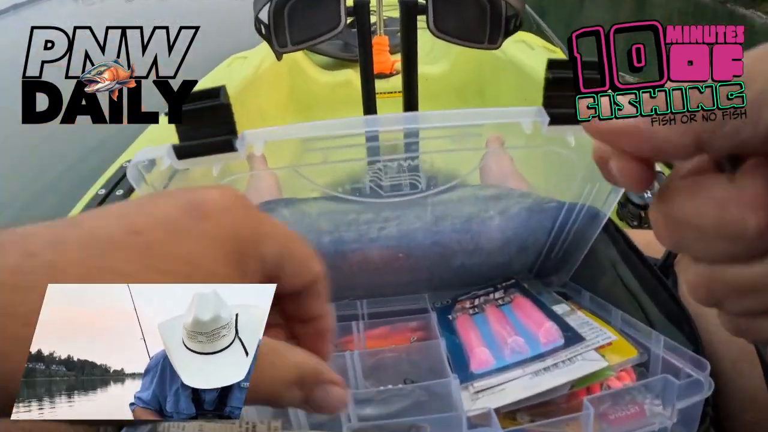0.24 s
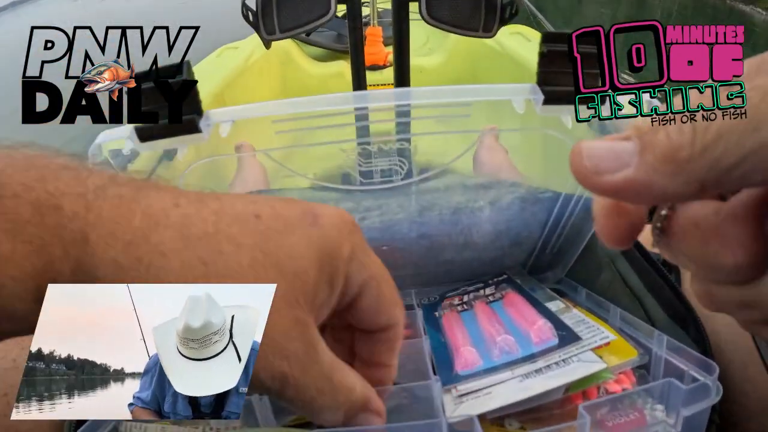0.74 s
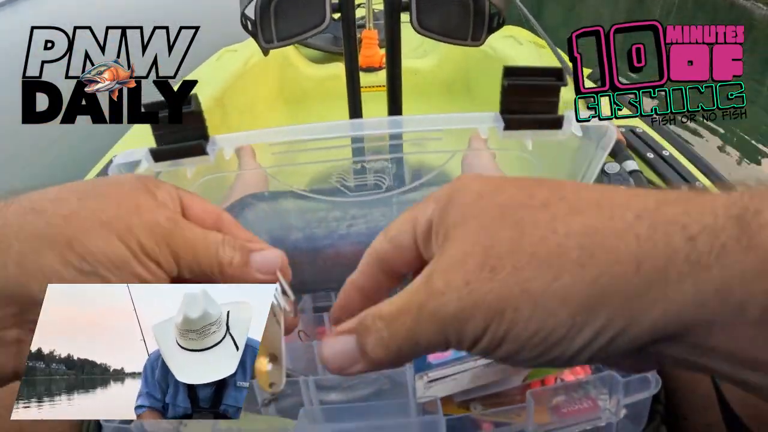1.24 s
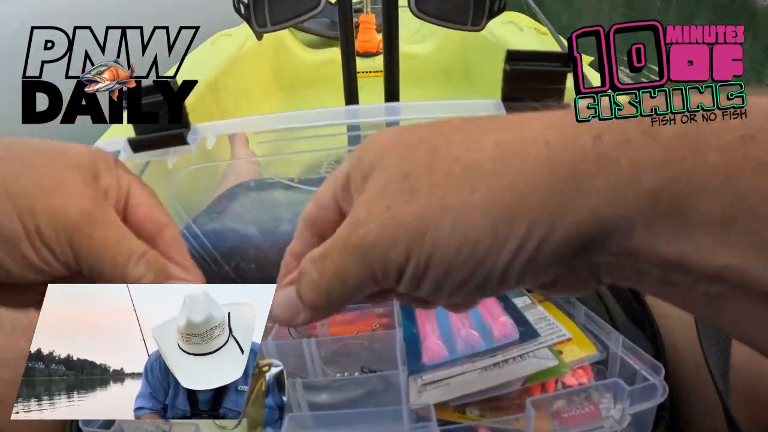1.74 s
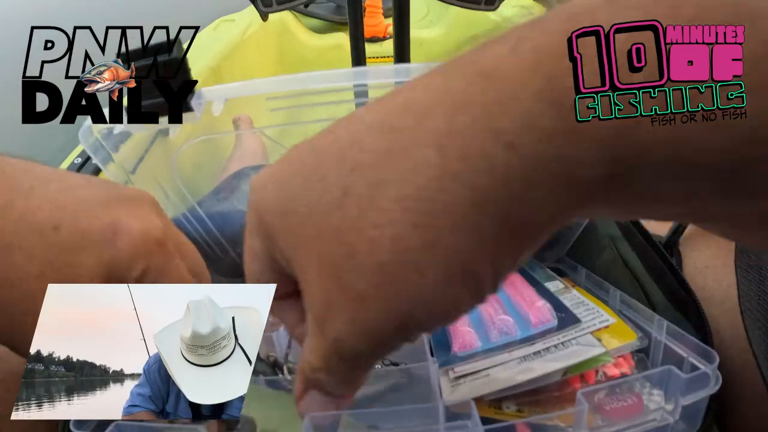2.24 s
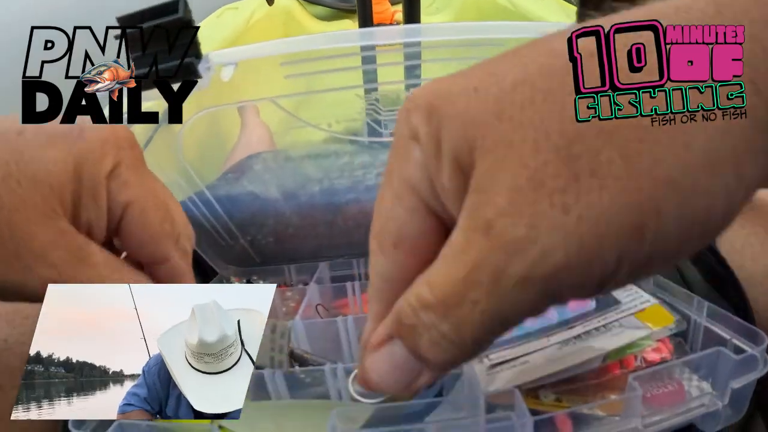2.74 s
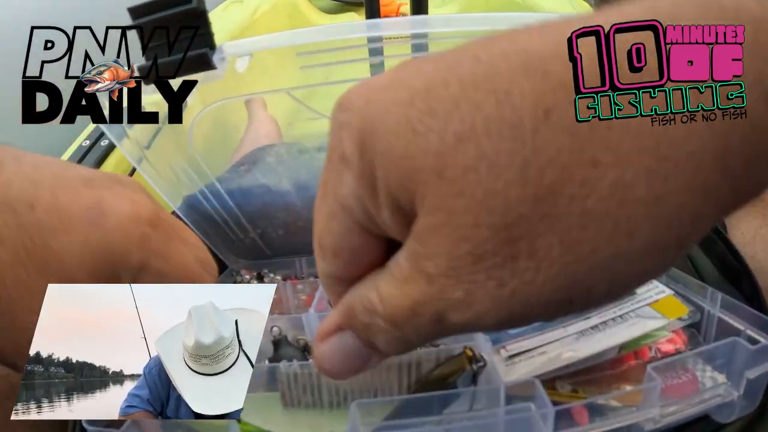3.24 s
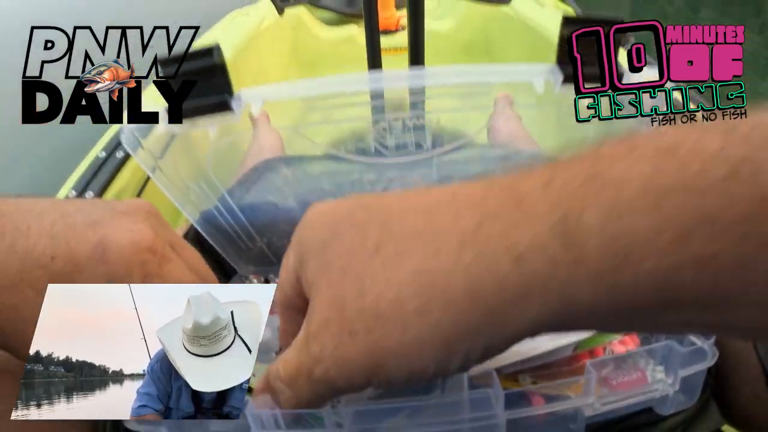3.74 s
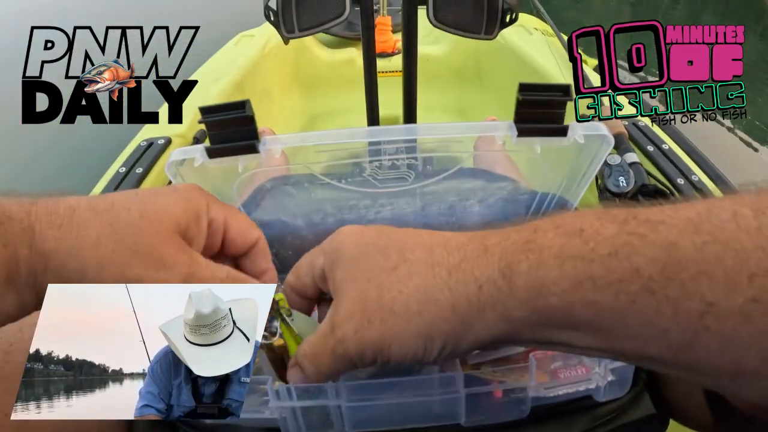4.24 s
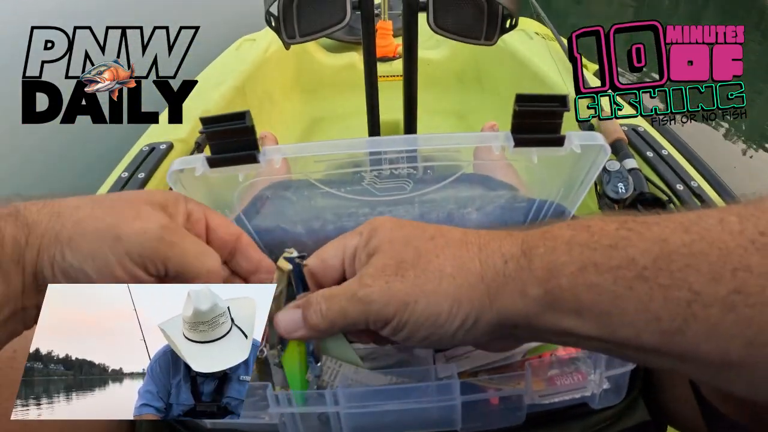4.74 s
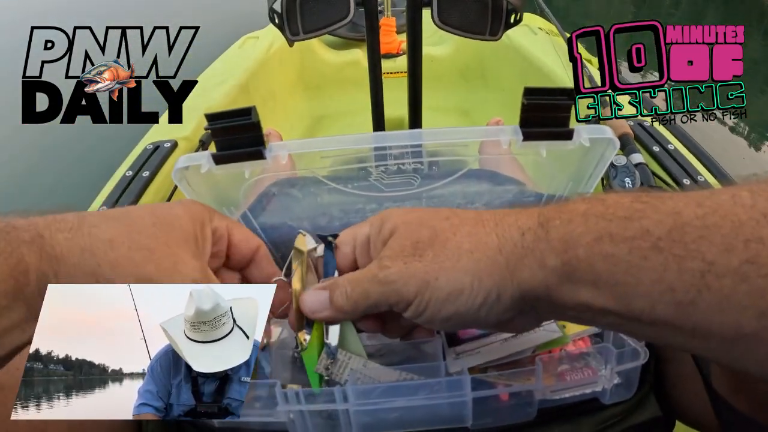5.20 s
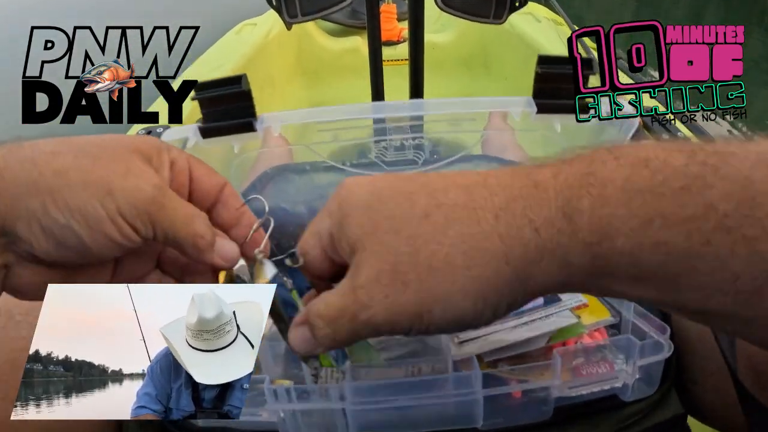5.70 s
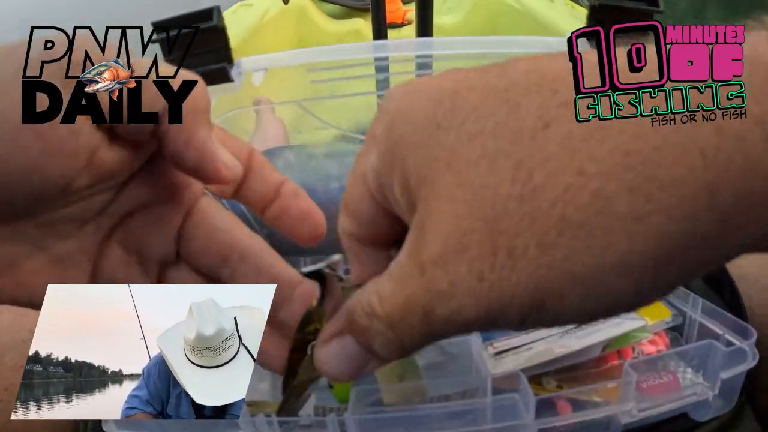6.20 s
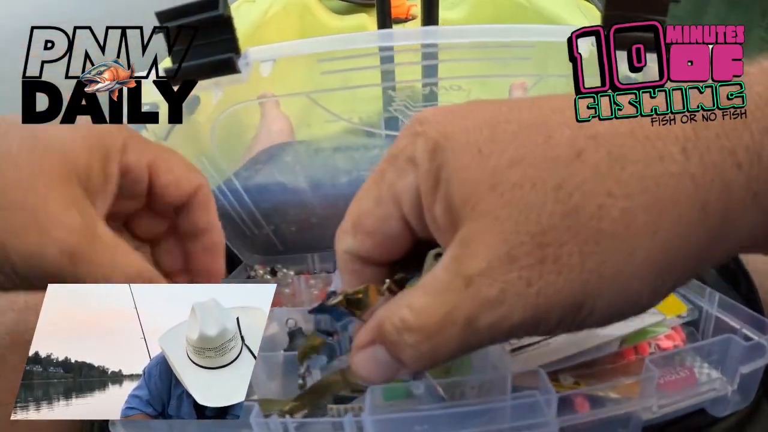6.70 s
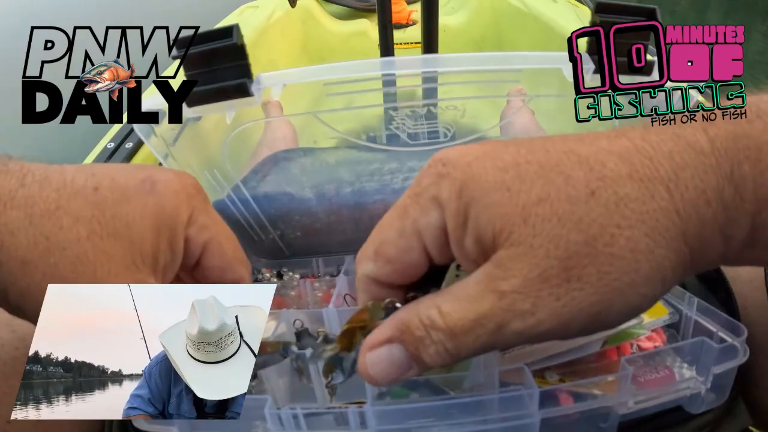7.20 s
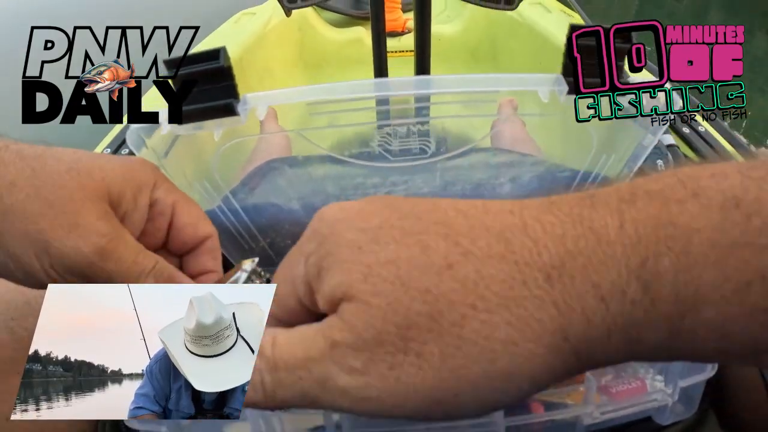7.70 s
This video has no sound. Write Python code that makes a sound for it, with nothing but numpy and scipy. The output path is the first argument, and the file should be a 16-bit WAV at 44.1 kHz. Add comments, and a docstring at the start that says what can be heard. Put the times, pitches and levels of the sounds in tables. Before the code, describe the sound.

Close, dry outdoor sound with slight stereo width. For the first 0.4 s only low air rumble and a faint distant engine hum are heard, then a soft bump and light brushes. From 0.9 to 1.5 s plastic ticks, short scrapes and thin metallic tings appear. At 1.7-1.9 s comes a sharp clattering burst with a boxy knock; after a lull, 2.2-2.9 s brings dense rattling and scraping with bright, high ringing clinks. From 3.0 to 4.2 s drier ticks and scratchy drags follow, with small dull thuds. Between 4.3 and 5.6 s it is sparser: tiny hook ticks, a crisp double knock near 4.8. Jingling resumes at 5.7; the strongest hollow bump lands at 6.03 with high clinks. Scattered knocks and scrapes continue until a dense clatter at 7.8-7.95 s. The engine's drone sinks slowly throughout.

```python
"""Lures scrape, knock and clink as hands rummage in an open plastic tackle box on a kayak, close by.
Knocks and bumps excite decaying modes of the box; scrapes are stick-slip jolts, rustle is even friction.
Metal lures ring in modes of their own, and dull thuds come from the hull.
Behind them a far engine, three harmonics of a sinking pitch, drones over filtered-noise outdoor air."""
import sys
import numpy as np
from scipy import signal
from scipy.fft import rfft, irfft, next_fast_len
from scipy.io import wavfile
from scipy.ndimage import uniform_filter1d

SR = 44100
rng = np.random.default_rng(int(sys.argv[2]) if len(sys.argv) > 2 else 0)


def wav_out(sig):
    """Save sig, one row per channel (or a flat mono array), as 16-bit PCM at SR to the path in sys.argv[1]."""
    wavfile.write(sys.argv[1], SR, np.round(np.clip(np.atleast_2d(sig).T, -1, 1) * 32767).astype(np.int16))


N = 350576

# A lure or hook strikes the plastic, levels as rms over 10 ms before each layer's gain:
# start_s, wall_knock_db, sharp_tick_db, tick_pitch_hz
STRIKES = [(0.898, -44, -31.5, 4000), (0.928, -26, -31, 2720), (0.984, -31.5, -30.5, 2000),
           (1.042, -54, -33.5, 4200), (1.1442, -23.5, -29.5, 2640), (1.177, -48, -33, 3400),
           (1.283, -44, -35, 2370), (1.727, -24.5, -21.5, 2770), (1.742, -28, -29.5, 7700),
           (1.773, -21.5, -25.5, 3040), (1.796, -24, -24, 1900), (1.829, -20, -24, 1900),
           (2.049, -44.5, -49, 1900), (2.203, -39, -36, 2700), (2.229, -29, -23, 2794),
           (2.261, -22.5, -25, 2730), (2.347, -28, -29, 2980), (2.379, -23, -24, 1920),
           (2.435, -26, -25, 4240), (2.472, -29, -42, 5000), (2.657, -29, -25.5, 8300),
           (2.72, -27.5, -23.5, 2500), (2.869, -35, -24, 7300), (2.902, -27, -25, 1900),
           (2.917, -36, -26.5, 3150), (3.021, -34, -38, 2430), (3.103, -36.5, -28, 4070),
           (3.13, -35.5, -30.5, 5000), (3.155, -46, -29, 3550), (3.183, -31.5, -26, 2100),
           (3.409, -39, -26, 5040), (3.442, -35, -36, 3900), (3.478, -28, -28, 3660),
           (3.487, -22.5, -34, 3500), (3.498, -26, -28.5, 3800), (3.609, -34, -25.5, 3966),
           (3.63, -31, -25.5, 2500), (3.65, -30.5, -29, 3800), (3.713, -30, -55, 1900),
           (3.742, -26, -31.5, 3820), (3.803, -27.5, -30, 4200), (3.855, -28, -35.5, 1890),
           (3.94, -37, -31, 11000), (3.996, -46, -30.5, 3530), (4.033, -32.5, -31.5, 1880),
           (4.093, -31, -36.5, 1910), (4.117, -24.5, -24.5, 6900), (4.144, -37, -36, 1900),
           (4.188, -41, -35, 1900), (4.38, -41, -29, 6800), (4.429, -49, -29, 6700),
           (4.509, -34, -34.5, 11000), (4.5784, -48, -24.5, 9300), (4.5818, -35, -25.5, 3980),
           (4.72, -58, -35, 6000), (4.764, -39, -27.5, 4070), (4.779, -35, -25, 1870),
           (4.792, -43.5, -29, 4300), (4.796, -22, -22, 1900), (4.807, -21.5, -23.5, 4230),
           (4.905, -42.5, -30, 1880), (4.921, -37.5, -35, 5000), (5.003, -41.5, -41.5, 3960),
           (5.147, -43, -62, 2600), (5.178, -45, -42, 11000), (5.255, -40, -25.5, 5040),
           (5.277, -39.5, -32, 5600), (5.297, -47, -30.5, 6400), (5.327, -49, -33.5, 5200),
           (5.366, -47.5, -44.5, 6940), (5.475, -38.5, -48, 2000), (5.878, -36, -24.5, 6260),
           (5.976, -53, -27, 8260), (6.046, -17, -27, 1860), (6.085, -26, -46, 1900),
           (6.107, -31.5, -56, 2100), (6.178, -34, -29.5, 1880), (6.311, -40, -24.5, 4060),
           (6.364, -23, -28, 4500), (6.407, -25.5, -30.5, 2520), (6.525, -34, -28.5, 1860),
           (6.585, -34.5, -32, 4020), (6.635, -38, -28.5, 2620), (6.717, -30, -22.5, 6860),
           (6.771, -59, -33, 5900), (6.812, -50, -26, 4730), (6.883, -46, -33.5, 3760),
           (7.022, -27.5, -29.5, 4200), (7.04, -24.5, -25.5, 1900), (7.238, -25.5, -27, 4500),
           (7.286, -36, -28, 3500), (7.378, -33, -26, 3510), (7.458, -24, -27, 1900),
           (7.518, -40, -36, 4000), (7.587, -54, -33, 2410), (7.635, -43, -30.5, 3078),
           (7.737, -25, -32, 1891), (7.807, -29, -21, 3330), (7.823, -22, -24.5, 4500),
           (7.837, -23, -28, 1900), (7.861, -19.5, -43, 1900), (7.875, -26, -23, 5000),
           (7.903, -46, -26.5, 7400), (7.935, -27, -27.5, 4276)]
# Nominal modes of the box floor and of its thin walls: frequency_hz, level_db, t60_s
BOX_MODES = [(253.6, -9, 0.043), (350.4, -14, 0.062), (393, -12.5, 0.057), (467, -5.5, 0.024),
             (551.6, -5.5, 0.037), (928, -5.5, 0.022), (1062, -1, 0.021), (1149.5, -2, 0.029),
             (1255, -8, 0.034), (1418, -4.5, 0.024), (1531, -0.5, 0.023), (1752, 2.5, 0.013),
             (2130, -3, 0.0034)]
# The hands work with the spoon lure until this time, then with the spinner blades.
SPOON_UNTIL_S = 3.3
# How long the plastic yields under a blow: a wall, and a hard point.
WALL_GIVE_S, POINT_GIVE_S = .0015, .0004


def knocks(wall_gain_db=-0.5, tick_gain_db=-1.5, slope_db=3.0, hardness=0.054):
    """Modal excitation by impact: each contact ticks and rings the box; a sharper one favours higher modes."""
    out = np.zeros(N)
    span = np.sqrt(SR / 100)  # turns unit energy into unit rms over 10 ms
    for start_s, wall_db, sharp_db, pitch_hz in STRIKES:
        tilt_db = slope_db + hardness * (sharp_db - wall_db)
        body = ring(box_at(start_s), detune=0.022, slope_db=tilt_db)
        knock = unit(pressed(body, WALL_GIVE_S))
        point = unit(pressed(tick(pitch_hz, snap=0), POINT_GIVE_S))
        add(out, start_s, span * amp(wall_db + wall_gain_db) * knock)
        add(out, start_s, span * amp(sharp_db + tick_gain_db) * point)
    return out


def box_at(s, lead_db=4.0, lead_width_hz=130):
    """Position-dependent coupling: the modes of the wall that the hands work at are raised."""
    # The wall nearest the hands, by the pitch it rings at most: time_s, frequency_hz
    near_wall = [(1.9, 1100), (2.4, 1450), (2.9, 1146), (3.45, 1500), (3.75, 1430), (4.1, 1140),
                 (6.4, 1120), (6.7, 1450), (7.25, 1484), (7.45, 1169)]
    lead_hz = np.interp(s, *np.transpose(near_wall))
    modes = []
    for hz, db, t60 in BOX_MODES:
        lift_db = lead_db * np.exp(-((hz - lead_hz) / lead_width_hz) ** 2)
        modes.append((hz, db + lift_db, t60))
    return modes


def tick(hz, t60=0.015, snap=0.94, focus_db=11.0, octaves=0.38, size=1024):
    """Contact and scattering: a snap and dense reflections, coloured by a local resonance of the plastic."""
    # Colour of hard points on stiff plastic: frequency_hz, level_db (per Hz)
    tick_colour = [(800, -16.5), (1500, -5.5), (4000, -3), (7500, -6.5), (10000, -11.5), (12400, -17.5),
                   (14600, -29.5), (16200, -45)]
    t = np.arange(size) / SR
    f = abs(np.fft.fftfreq(size, 1 / SR))
    decay = amp(-60 * t / t60) + amp(-28 - 60 * t / .05)  # fast reflections and a faint tail
    burst = rng.standard_normal(size) * decay
    burst[0] += snap
    focus = focus_db / (1 + (np.log2((f + 1) / hz) / octaves) ** 2)
    log_gain = np.log(amp(read(tick_colour, f)[0] + focus))
    # The Hilbert transform of the log gain gives a minimum-phase filter.
    response = np.exp(np.conj(signal.hilbert(log_gain)))
    return unit(np.fft.ifft(np.fft.fft(burst) * response).real)


def scrape(rattle, scratch, wall_db=-2.5, scratch_db=0.0, scratch_hz=4400, scatter=.5, slope_db=-2.0):
    """Stick-slip excites tray and walls: slips come faster under a harder drag, twice as fast with the spoon."""
    slips_per_s = 70 + 2000 * (scratch / scratch.max()) ** .9
    spoon = np.arange(N) / SR < SPOON_UNTIL_S
    jolts = slips(slips_per_s * (1 + spoon))

    def wall_spot(s):
        return ring(box_at(s), detune=0.035, slope_db=slope_db, length=.035)

    def tray_spot(s):
        spot_hz = scratch_hz * np.exp(scatter * rng.standard_normal())
        return tick(spot_hz, focus_db=14., octaves=.35)

    walls = travel(jolts * rattle, wall_spot)
    tray = travel(jolts * scratch, tray_spot)
    return amp(wall_db) * walls + amp(scratch_db) * tray


def slips(per_s, spread_db=7.0):
    """Stick-slip as a random point process: jolts of uneven size share the hand's push."""
    size_db = spread_db * np.minimum(rng.exponential(1, N), np.pi)
    jolt = amp(size_db) * (rng.random(N) < per_s / SR)
    shared_power = np.maximum(uniform_filter1d(jolt ** 2, size=1200), 1e-3)
    return jolt * rng.choice([-1, 1], N) / np.sqrt(shared_power)


def handling(swing_db=4, fidget_catch_db=-4):
    """Power addition of drags, skitters and fidgeting; fidgeting drives the jolts less than the even friction."""
    # A lure is dragged through the tray, levels before easing and layer gains:
    # start_s, length_s, wall_rattle_db, fine_scratch_db
    drags = [(0.424, 0.03, -44.5, -51), (0.64, 0.027, -43, -45.5), (0.735, 0.059, -38, -43.5),
             (0.80, 0.44, -43, -47), (0.937, 0.03, -33, -29.5), (1.09, 0.089, -39, -37),
             (1.295, 0.075, -35, -37), (1.38, 0.061, -43, -42.5), (1.545, 0.018, -76, -56),
             (1.772, 0.046, -28.5, -26), (1.84, 0.043, -29, -28), (2.115, 0.1, -43, -56),
             (2.235, 0.068, -28.5, -29), (2.318, 0.081, -26.5, -27.5), (2.415, 0.055, -34.5, -31),
             (2.48, 0.45, -43, -48.5), (2.53, 0.024, -44, -41), (2.594, 0.088, -29, -28.5),
             (2.72, 0.052, -36, -32.5), (2.83, 0.027, -33, -29.5), (2.853, 0.033, -25.5, -26.5),
             (2.90, 0.04, -32.5, -30), (3.35, 0.025, -43.5, -51), (3.398, 0.022, -35, -31),
             (3.44, 0.17, -42, -43.5), (3.595, 0.04, -32, -28), (3.69, 0.32, -37.5, -41),
             (3.757, 0.06, -25, -26.5), (3.82, 0.05, -39, -31.5), (3.98, 0.093, -36, -37.5),
             (4.135, 0.052, -34, -40.5), (4.37, 0.16, -36.5, -38.5), (4.62, 0.13, -48.5, -44),
             (4.82, 0.14, -49, -45.5), (5.235, 0.1054, -50, -39), (5.46, 0.063, -45, -51.5),
             (5.65, 0.41, -44, -47), (5.726, 0.066, -36.5, -31), (5.892, 0.029, -33.5, -30.5),
             (5.98, 0.088, -40, -35.5), (6.08, 0.12, -41, -40.5), (6.175, 0.026, -30.5, -28),
             (6.325, 0.037, -29.5, -29.5), (6.394, 0.093, -35, -34.5), (6.50, 0.25, -44.5, -40),
             (6.85, 0.145, -56, -50), (7.011, 0.075, -34, -33), (7.13, 0.074, -36.5, -36),
             (7.335, 0.15, -35, -36), (7.665, 0.058, -38.5, -38.5), (7.74, 0.28, -38.5, -36.5),
             (7.79, .12, -30.5, -31)]
    # Fingers fidget among the lures, mean levels: time_s, wall_rattle_db, fine_scratch_db
    fidget_curve = [(0.25, -77, -80), (0.45, -55, -63.5), (1.0, -57, -56), (1.55, -85, -65),
                    (2.0, -85, -70.5), (3.3, -58, -61), (4.3, -46.5, -59.5), (5.5, -55.5, -61.5),
                    (7.95, -42.5, -47.5)]
    drag = np.hypot(strokes(drags), skitter())
    fidget = amp(follow(fidget_curve) + swing_db * wander(top_hz=11))
    jolting = np.hypot(drag, amp(fidget_catch_db) * fidget)
    rubbing = np.hypot(drag, fidget)
    return jolting, rubbing


def strokes(rows, catch_s=0.0061, ease_db=-3.5, let_go_s=0.0094):
    """Friction envelope: each stroke catches quickly, eases and lets go; overlapping strokes add in power."""
    out = np.zeros((len(rows[0]) - 2, N))
    for start_s, length, *levels in rows:
        t = seconds(length + .1)
        rise = np.minimum(t / catch_s, 1)
        ease = amp(ease_db * np.minimum(t / length, 1))
        release = np.exp(-np.maximum(t - length, 0) / let_go_s)
        shape = rise * ease * release
        for power, db in zip(out, levels):
            add(power, start_s, (amp(db) * shape) ** 2)
    return np.sqrt(out)


def skitter(swell_in_s=0.0036, skitter_s=0.012, rattle_db=-8.5, scratch_db=-9.5):
    """Friction around impact: sound swells briefly into each knock and skitters on after it."""
    out = np.zeros((2, N))
    t = seconds(.12) - .02  # starts 20 ms before the knock
    shape = np.exp(np.where(t < 0, t / swell_in_s, -t / skitter_s))
    for start_s, wall_db, sharp_db, _ in STRIKES:
        add(out[0], start_s + t[0], amp(wall_db + rattle_db) * shape)
        add(out[1], start_s + t[0], amp(sharp_db + scratch_db) * shape)
    return out


def rustle(rattle, scratch, level_db=-5.5, rub_hz=2400, wall_db=-5.5):
    """Broadband friction: fingers slide evenly on the plastic and keep the walls murmuring."""
    friction = rng.standard_normal(N)
    wall_response = unit(ring(BOX_MODES, detune=.02, length=.06))
    walls = signal.oaconvolve(friction * rattle, wall_response)[:N]
    rub = travel(friction * scratch, lambda s: tick(rub_hz, focus_db=8.0), size=1000)
    return amp(wall_db) * walls + amp(level_db) * rub


def hooks(scratch, per_s=28.0, level_db=-17.0, free_db=-43, spread_db=-7., hook_hz=5500):
    """Random impacts: loose hooks tick on the dividers at various pitches, louder as the tray is stirred."""
    out = np.zeros(N)
    # Above the scratch level free_db the hooks rattle freely and grow no louder.
    stir = amp(level_db) * np.minimum(scratch / amp(free_db), 1)
    for n in np.flatnonzero(rng.random(N) < per_s / SR):
        pitch_hz = hook_hz * 2 ** rng.uniform(-1.2, .9)
        hook = tick(pitch_hz, focus_db=18., octaves=.3)
        add(out, n / SR, stir[n] * amp(spread_db * rng.exponential()) * hook)
    return out


def clinks(others_db=-15.0, t60=0.06, slope_db=7.0, bounce_s=.009, bounce_db=-9.0, count=3):
    """Free metal modes: a lure, spoon or blade, bounces and rings; one partial leads, its pitch varying a little."""
    # A metal lure rings out, level before its onset shape: start_s, level_db, leading_partial_hz
    lure_hits = [(1.36, -32, 6520), (1.431, -36, 7570), (1.474, -39, 11530), (1.686, -30, 7540),
                 (1.743, -24, 6900), (1.773, -21, 7630), (2.268, -20, 7600), (2.449, -18, 5050),
                 (2.611, -17, 5130), (2.673, -22, 9490), (2.745, -19, 7360), (2.859, -19.5, 7540),
                 (2.872, -21, 5200), (3.102, -25, 5184), (4.704, -33, 8300), (5.944, -20.5, 9560),
                 (6.012, -19, 9560), (6.139, -28, 8400)]
    out, t = np.zeros(N), seconds(.15)
    contact = 1 - np.exp(-t / .001)
    for s, db, hz in lure_hits:
        for k in range(count):
            lead_hz = hz * (1 + k * .01 * rng.standard_normal())
            lead = np.sin(2 * np.pi * lead_hz * t) * amp(-60 * t / t60)
            metal = ring(metal_modes(s), detune=.008, slope_db=slope_db)[:len(t)]
            add(out, s, amp(db + k * bounce_db) * contact * (lead + amp(others_db) * metal))
            s += bounce_s * (.5 + rng.random())
    return out


def jingles(per_s=350.0, slope_db=8.5):
    """Repeated modal excitation: a dangling lure chatters on its ring in changing mixes of its higher modes."""
    # A lure dangles and jingles, level before easing: start_s, length_s, level_db
    jingle_strokes = [(1.295, 0.12, -45.5), (1.74, 0.097, -31.5), (2.26, 0.13, -43), (2.61, 0.13, -32.5),
                      (2.85, 0.082, -45), (4.63, 0.085, -44.5), (5.728, 0.083, -37), (5.89, .06, -46),
                      (5.985, 0.039, -26.5), (6.128, 0.04, -33), (6.395, 0.072, -35), (6.665, 0.037, -34),
                      (7.07, .02, -39), (7.788, 0.13, -40)]
    (level,) = strokes(jingle_strokes)

    def touched(s):
        return ring(metal_modes(s), detune=0.0112, slope_db=slope_db, length=.08)

    return travel(slips(per_s) * level, touched, size=150)


def metal_modes(s):
    """Modal signature of the metal in hand: a spoon lure first, then a bunch of spinner blades."""
    # Nominal modes of the spoon lure: frequency_hz, level_db, t60_s
    spoon_modes = [(3617, -5, .05), (4840, -3, .06), (5190, 0, .08), (6500, -6, .06), (7610, 0, .09),
                   (8300, -8, .06), (9850, -4, .09), (10845, -14, .06), (12020, -9, .09), (14590, -22, .08)]
    # Nominal modes of the spinner blades: frequency_hz, level_db, t60_s
    blade_modes = [(3606, 4, 0.0076), (6400, 4, 0.012), (7500, 9, 0.014), (8250, 4, 0.015),
                   (8840, -1, 0.012), (9650, 4.5, 0.026), (10918, -6, 0.015), (12010, -14, 0.027)]
    return spoon_modes if s < SPOON_UNTIL_S else blade_modes


def bumps(box_db=0.0, slope_db=-10.5, thud_rise_s=0.0059):
    """Low-mode excitation: soft pushes boom in the box and thud in the hull under it."""
    # The whole box is bumped: start_s, peak_db
    box_bumps = [(0.423, -22), (1.144, -20.5), (1.741, -22), (1.775, -19.5), (1.83, -12.5), (2.361, -20),
                 (2.607, -24), (2.643, -14.5), (3.407, -26), (3.608, -30), (3.791, -20), (4.114, -23.5),
                 (4.268, -30.5), (4.661, -27), (5.756, -25), (6.03, -10), (7.885, -20), (7.924, -16.5)]
    # Dull thuds of the hull, level at the top of the envelope: start_s, level_db, pitch_hz
    hull_thuds = [(0.593, -28, 61), (3.028, -27.5, 31.6), (3.061, -28.5, 56.5), (3.788, -26, 183),
                  (6.783, -33.5, 35.65)]
    out, t = np.zeros(N), seconds(.2)
    for start_s, db in box_bumps:
        body = ring(BOX_MODES, detune=0.011, slope_db=slope_db)
        boom = radiated(pressed(body, WALL_GIVE_S))
        add(out, start_s, amp(db + box_db) * boom / abs(boom).max())
    swell = t / thud_rise_s * np.exp(1 - t / thud_rise_s)
    for start_s, db, hz in hull_thuds:
        add(out, start_s, amp(db) * swell * np.sin(2 * np.pi * hz * t))
    return out


def ring(modes, detune, slope_db=0, length=.25):
    """Modal superposition: decaying sines whose random shares and signs stand for where the blow lands."""
    t = seconds(length)
    hz, db, t60 = np.transpose(modes)[:, :, None]
    share, shift, side = rng.standard_normal((3, len(modes), 1))
    # A negative slope, as from a soft contact, favours the low modes.
    db = db + 2.5 * share + slope_db * np.log2(hz / hz.mean())
    decay = np.sign(side) * amp(db - 60 * t / t60)
    return (decay * np.sin(2 * np.pi * hz * (1 + detune * shift) * t)).sum(0)


def pressed(x, rise_s):
    """Contact compliance: the plastic yields, so its sound builds up over a moment."""
    return x * (1 - np.exp(-np.arange(len(x)) / SR / rise_s))


def travel(drive, body_at, size=600):
    """Moving excitation: the contact rests briefly on one spot, then moves on to one that rings differently."""
    out, n = np.zeros(N), 0
    while n < N:
        push = drive[n:n + rng.integers(size // 2, 2 * size)]
        if push.any():
            add(out, n / SR, signal.fftconvolve(push, unit(body_at(n / SR))))
        n += len(push)
    return out


def radiated(x, lowest_hz=152.0):
    """Radiation cutoff: the small box radiates little below its lowest mode."""
    return signal.sosfilt(signal.butter(2, lowest_hz, "highpass", fs=SR, output="sos"), x)


def hollow(x, from_s=4.05, until_s=5.65):
    """Spectral gap: blades hang in a narrow compartment, hollow between its floor modes and wall modes."""
    t = np.arange(N) / SR
    gap = signal.lfilter(*signal.iirpeak(760, 2.5, fs=SR), x)
    inside = (t > from_s) & (t < until_s)
    return x - (1 - amp(-15)) * gap * inside


def engine(third_db=-16.0, fade_db=0.7, waver_turns=0.01):
    """Harmonic source: only the lowest harmonics carry over the water, fading in the moving air."""
    # Far engine, rms levels before fading: time_s, firing_rate_hz, fundamental_db, second_harmonic_db
    engine_curve = [(0, 92.6, -46.5, -39), (2.45, 93.73, -46.5, -44.5), (2.9, 88.24, -50, -45),
                    (4, 86.85, -46.5, -41), (4.7, 79.55, -55.5, -46.5), (5.8, 74.13, -53, -52.5),
                    (7, 69.4, -60, -39.5), (7.95, 62.83, -42.5, -47)]
    hz, first_db, second_db = follow(engine_curve)
    turns = np.cumsum(hz) / SR + waver_turns * wander(4.1)
    out = np.zeros(N)
    for order, db in enumerate([first_db, second_db, second_db + third_db], start=1):
        level = np.sqrt(2) * amp(db + fade_db * wander(3.9))
        out += level * np.sin(2 * np.pi * order * turns)
    return out


def air(swell_db=-0.8):
    """Spectrally shaped noise: a low outdoor rumble with a very faint hiss."""
    # Colour of the outdoor air: frequency_hz, level_db (per Hz, relative)
    air_colour = [(30, -5), (70, -4), (110, -7.5), (160, -1.5), (210, -3.5), (270, -8), (340, -15),
                  (450, -24), (800, -39), (2000, -43), (5000, -52), (16000, -66)]
    # Its rms level before the slow swell: time_s, level_db
    air_level = [(0, -38), (3, -41), (4.2, -40), (5, -44.5), (5.6, -43), (6.6, -39), (7.95, -40.5)]
    colour = amp(read(air_colour, np.fft.rfftfreq(N, 1 / SR))[0])
    noise = evened(irfft(rfft(rng.standard_normal(N)) * colour, N))
    return noise * amp(follow(air_level)[0] + swell_db * wander(3.8))


def stereo(x, count=3):
    """Decorrelation by reflection: two ports hear different lid reflections, changing as the hands move."""
    # The microphone pair: frequency_hz, side_share_db, left_minus_right_db
    port_pair = [(30, -30, -1.5), (151, -34.5, 0.5), (495, -16, 0.5), (1250, -9.5, 0), (2480, -8, -1.2),
                 (4440, -10, 0.9), (9200, -10, 2), (13000, -2.5, 5.5)]
    size, t = next_fast_len(N), seconds(.01)
    hz, mid = np.fft.rfftfreq(size, 1 / SR), rfft(x, size)
    side_db, balance_db = read(port_pair, hz)
    side = np.zeros(N)
    for _ in range(count):
        lid = rfft(rng.standard_normal(len(t)) * np.exp(-t / .001), size)
        smear = np.exp(1j * np.angle(lid))  # only the phase of the reflections
        reflected = irfft(mid * smear * amp(side_db), size)[:N]
        side += reflected * wander(top_hz=27) / np.sqrt(count)
    balanced = irfft(mid * amp([balance_db / 2, -balance_db / 2]), size)[:, :N]
    return balanced + [side, -side]


def wander(top_hz, count=20):
    """Slow fluctuation of rms 1: sines from 1 Hz to top_hz superposed in random phase."""
    t = np.arange(0, N + 256, 256) / SR
    slow = sum(np.sin(2 * np.pi * (f * t + rng.random())) for f in np.geomspace(1, top_hz, count))
    return evened(np.interp(np.arange(N) / SR, t, slow))


def amp(db):
    """Level to amplitude: 20 dB is a factor of ten."""
    return 10 ** (np.asarray(db) / 20)


def evened(x):
    """Power normalization: scales to rms 1."""
    return x / np.sqrt(np.mean(x ** 2) + 1e-20)


def unit(x):
    """Energy normalization: scales to energy 1."""
    return x / np.sqrt(np.sum(x ** 2) + 1e-20)


def read(points, hz):
    """Interpolation over log frequency: each column of a spectrum table at the given frequencies."""
    f, *columns = np.transpose(points)
    return [np.interp(np.log(hz + 1), np.log(f + 1), c) for c in columns]


def follow(rows):
    """Linear interpolation over time: each column of a curve table at every sample."""
    s, *columns = np.transpose(rows)
    return [np.interp(np.arange(N) / SR, np.sort(s), c) for c in columns]


def seconds(length):
    """Sampled time axis from zero, in seconds."""
    return np.arange(int(length * SR)) / SR


def add(mix, s, sound):
    """Superposition: adds a sound into the mix from time s, cut at the end."""
    part = mix[max(round(s * SR), 0):][:len(sound)]
    part += sound[:len(part)]


def scene():
    """Superposition of the plastic box, the metal lures, the engine and the air, heard by two ports."""
    jolting, rubbing = handling()
    contacts = knocks() + scrape(*jolting) + rustle(*rubbing) + hooks(jolting[1])
    plastic = hollow(radiated(contacts) + bumps())
    return stereo(plastic + jingles() + clinks() + engine() + air())


def record(dry, edge_hz=16300):
    """Band limitation: the recorder's linear-phase low-pass."""
    lowpass = signal.firwin(255, edge_hz, window=("kaiser", 9), fs=SR)
    return signal.oaconvolve(dry, lowpass[None], "same")


dry = scene()
out = record(dry)
wav_out(out)
```